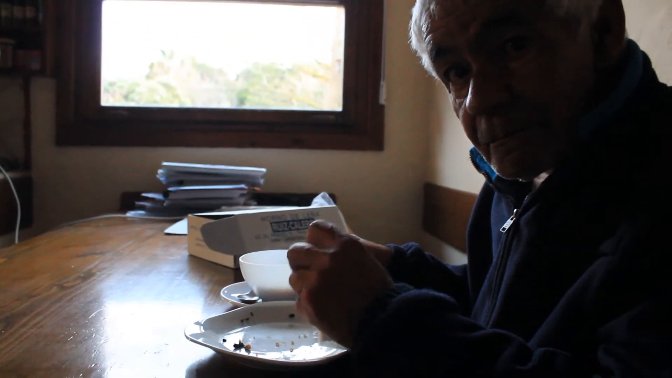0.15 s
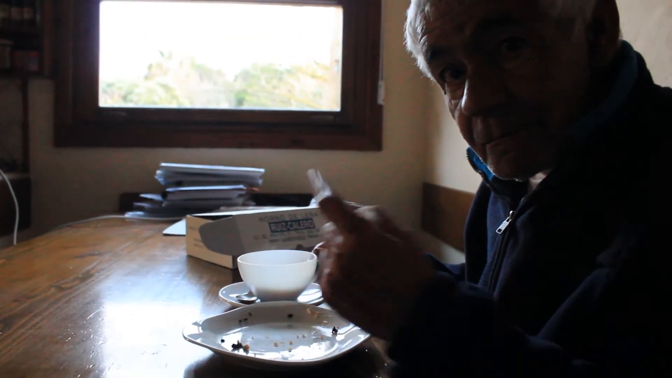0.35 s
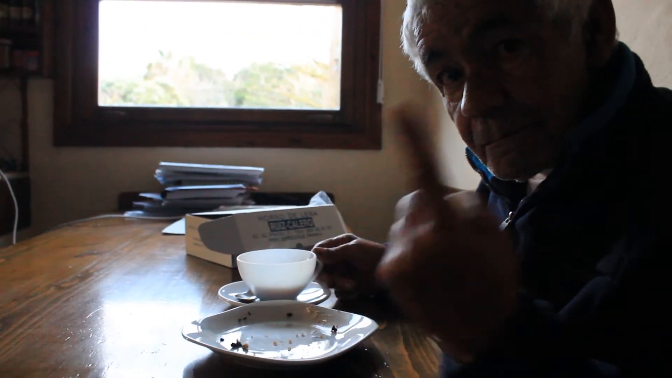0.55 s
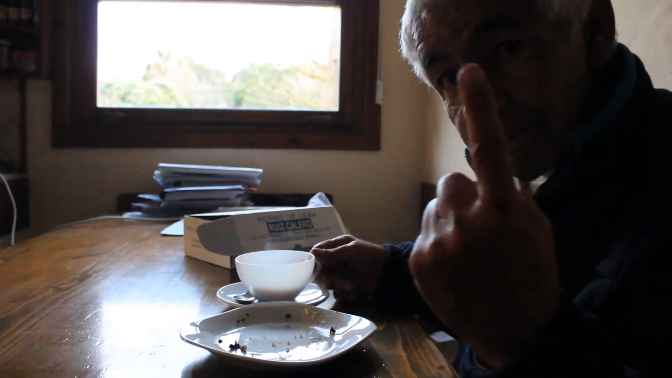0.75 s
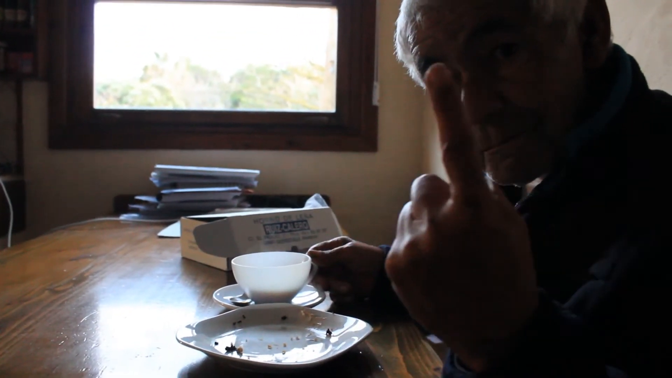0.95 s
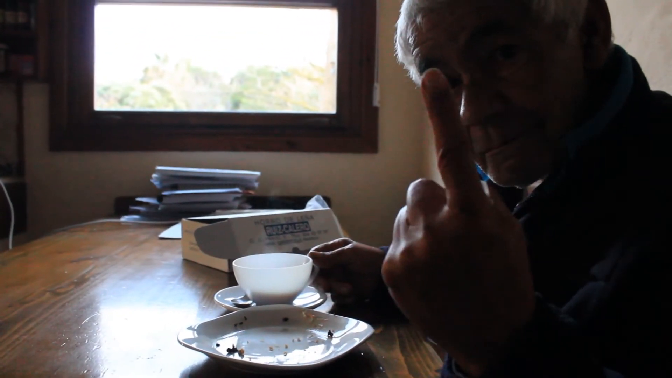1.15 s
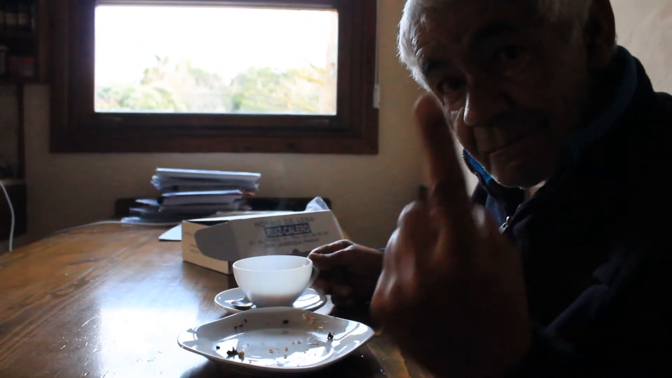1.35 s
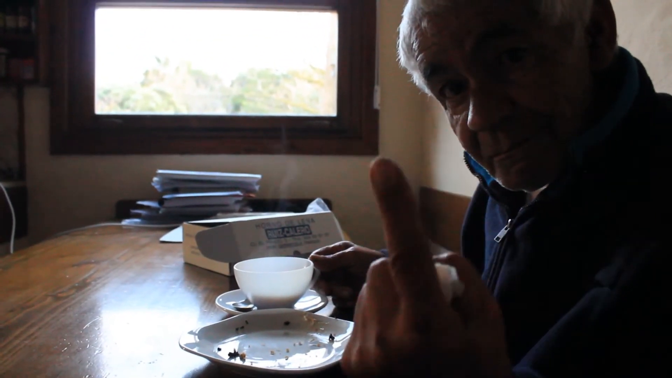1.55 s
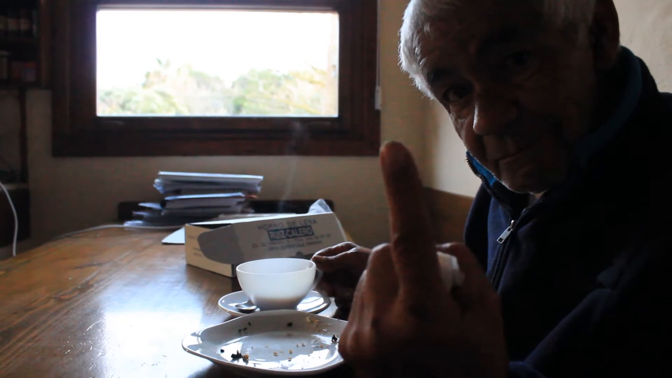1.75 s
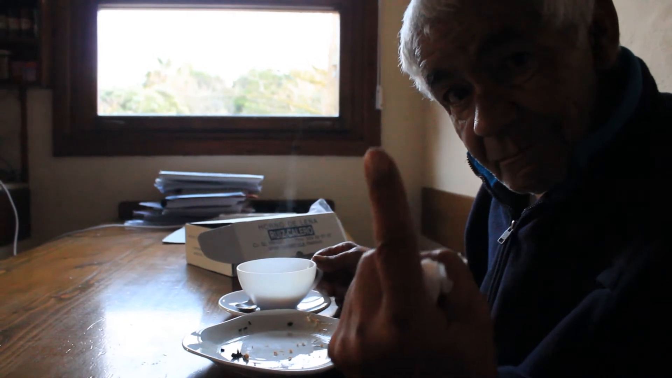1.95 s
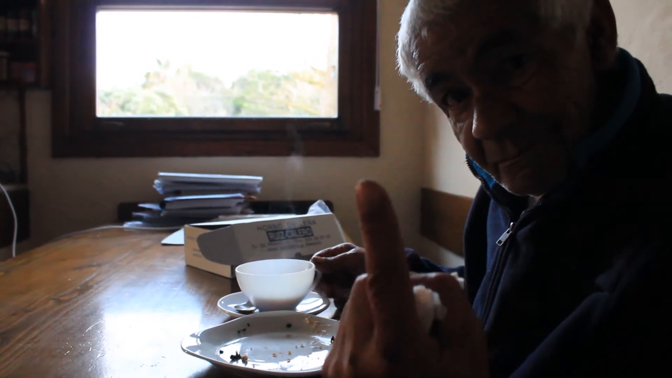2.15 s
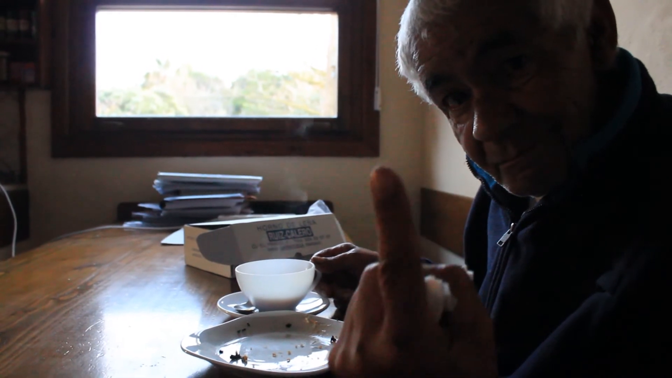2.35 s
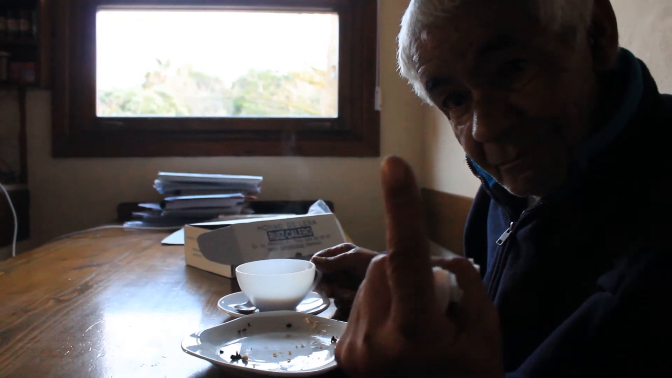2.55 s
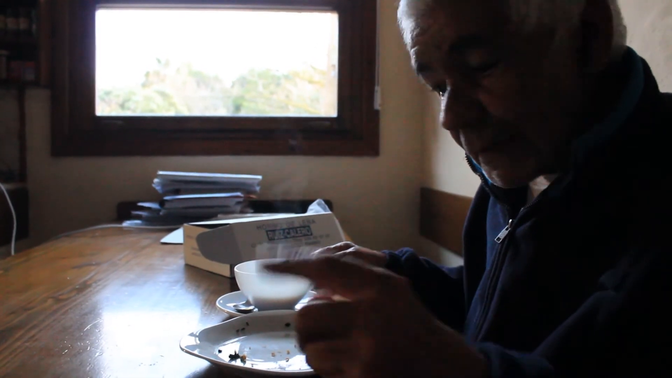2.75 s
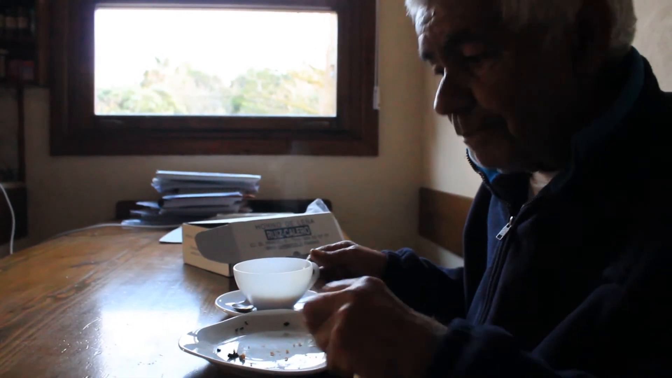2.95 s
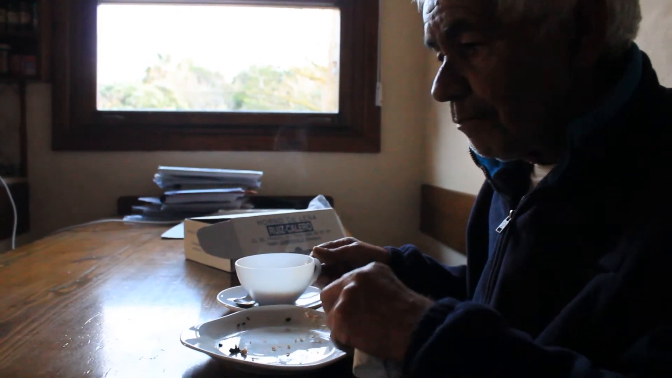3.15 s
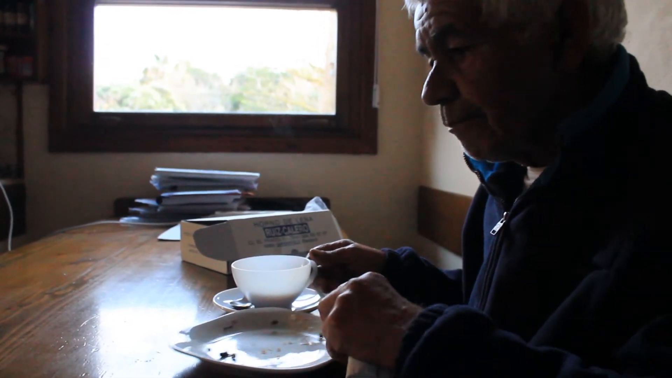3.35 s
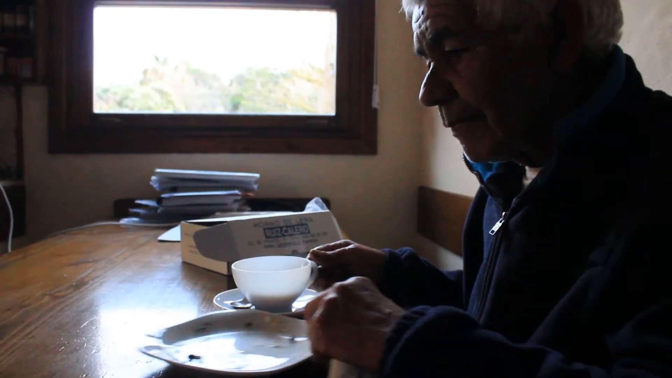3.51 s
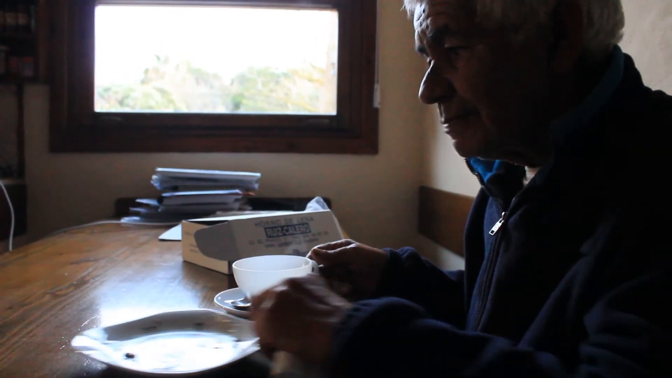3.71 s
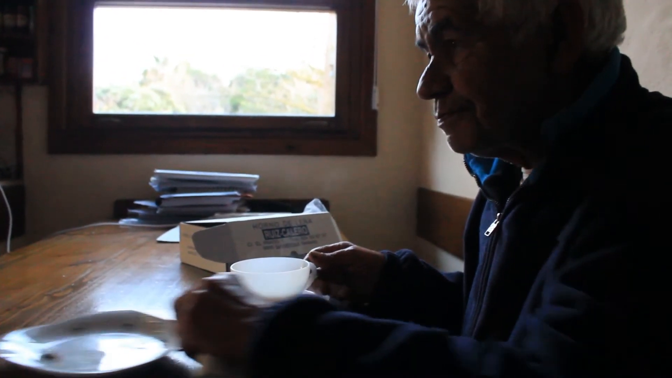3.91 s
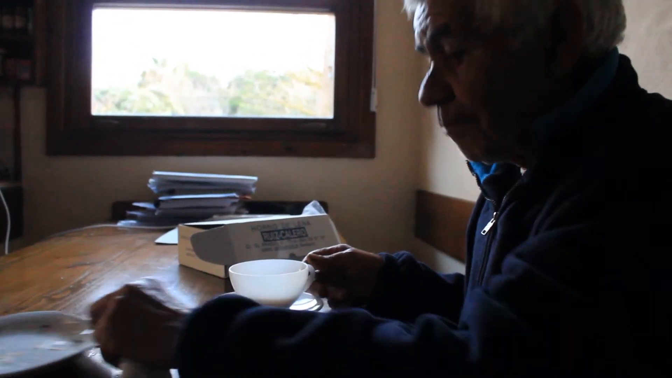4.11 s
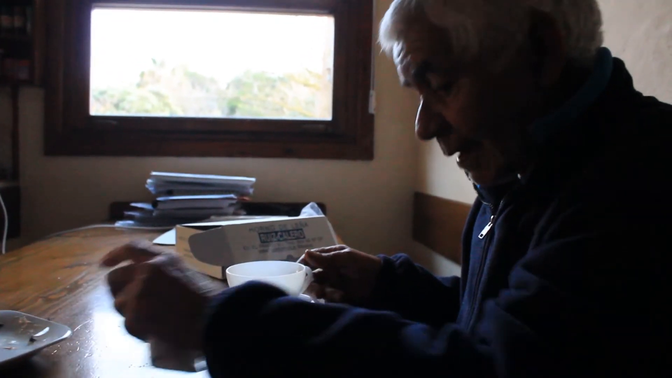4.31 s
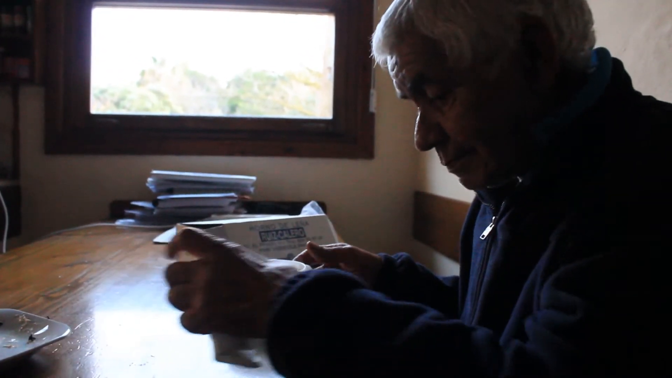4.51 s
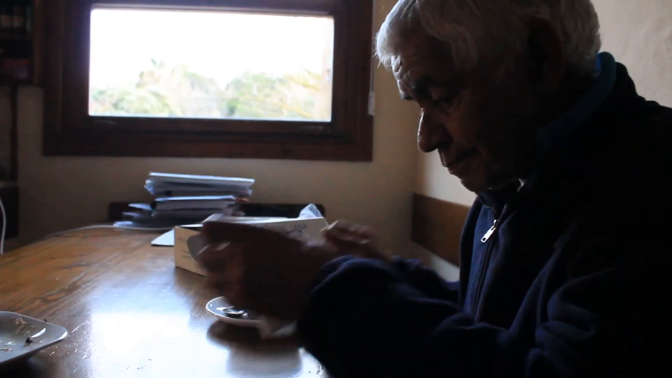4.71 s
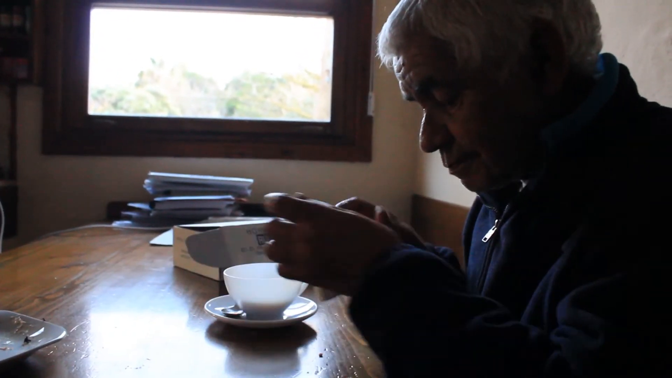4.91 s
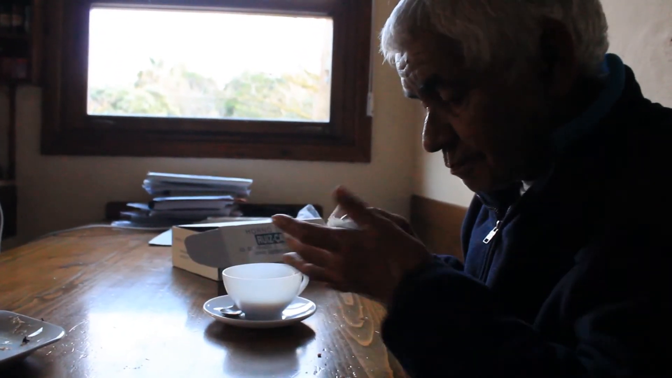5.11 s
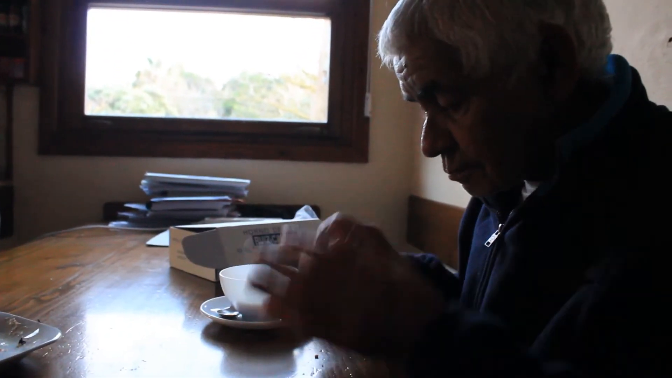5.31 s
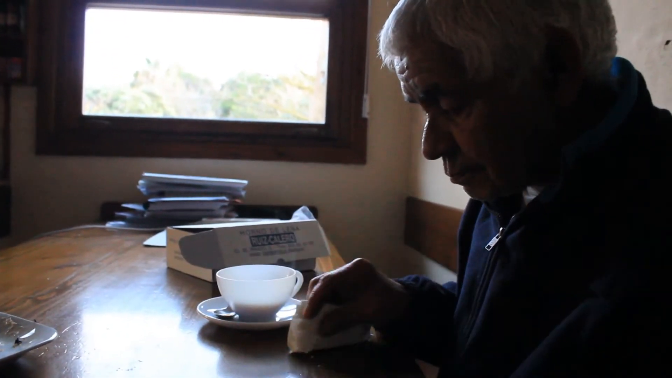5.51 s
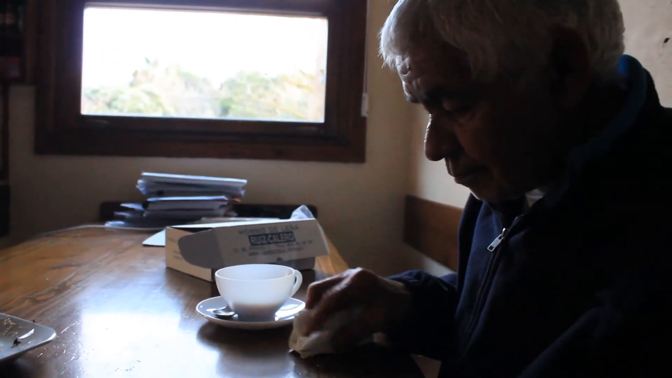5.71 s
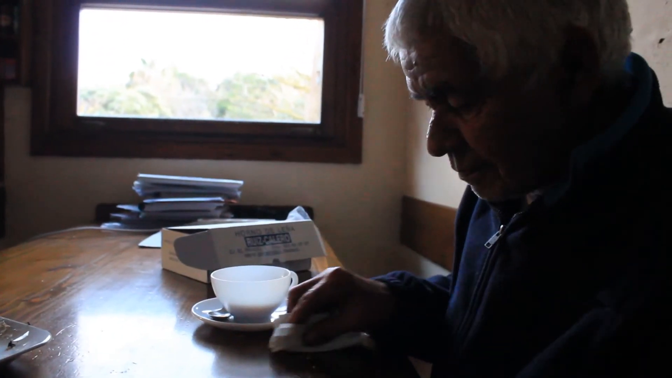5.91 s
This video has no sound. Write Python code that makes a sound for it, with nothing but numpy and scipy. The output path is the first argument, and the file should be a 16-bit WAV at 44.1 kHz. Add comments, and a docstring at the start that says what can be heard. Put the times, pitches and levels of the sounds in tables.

```python
"""China is handled on a wooden table in a bare, ringing kitchen, heard in mono from across the table.
A cup and spoon rattle on their saucer, a plate is knocked, the cup clinks: fading modes and dry clacks.
The plate is pushed over the wood: random slips shake the table top and the plate's rim.
Shaped noise makes the scuffs, taps, thumps, sharp dry ticks, rustling sleeves and napkin, and the hush."""
import sys
import numpy as np
from scipy import signal
from scipy.fft import rfft, irfft, next_fast_len
from scipy.io import wavfile
from scipy.ndimage import uniform_filter1d, map_coordinates

SR = 44100
rng = np.random.default_rng(int(sys.argv[2]) if len(sys.argv) > 2 else 0)


def store_pcm(level_fs):
    """Save levels as 16-bit WAV."""
    pcm = np.round(np.clip(level_fs, -1, 1) * 32767).astype(np.int16)
    wavfile.write(sys.argv[1], SR, np.atleast_2d(pcm).T)


N = 263277
TIME = np.arange(N) / SR
RING_TIME = np.arange(SR * 3 // 5) / SR  # time axis of one contact
TOP_HZ = 15500  # upper limit of the sound
SAUCER_REBOUND_S = .0175  # time between the contacts of one rattle

# Colour of a dry contact. Each row: frequency in Hz, relative level in dB.
CLACK_COLOUR = [(100, -30), (400, -16.5), (850, 1), (4000, 2), (7300, 3), (9000, -2.5), (12000, -12.5),
                (15000, -16)]


def saucer_and_spoon():
    """Cup and spoon jostle on the saucer, so that saucer and spoon ring together."""
    # Each row: start in seconds, loss per rebound in dB, ring brightness in Hz, clack level in dB,
    # saucer ring level in dB, spoon ring level in dB
    saucer_hits = [(.261, 6.5, 9400, -33, -36.5, -59), (.581, 6.5, 2500, -33, -30.5, -51),
                   (.612, 14, 1760, -43, -29.5, -50), (.664, 9, 13000, -34, -44, -54),
                   (.742, 5.5, 15000, -24.5, -28, -23.5), (.792, 3, 12100, -27, -24, -20),
                   (.843, 18.5, 3500, -31, -32, -48), (.871, 16, 15000, -37, -36, -27),
                   (1.542, 10, 8600, -36, -32, -34), (2.648, 9, 12000, -36, -39, -31),
                   (2.701, 5, 13000, -29.5, -35, -36), (3.040, 26, 6500, -55, -47, -46)]
    # Modes of the saucer. Each row: frequency in Hz, relative level in dB, time to fall 60 dB in seconds
    saucer_modes = [(1304, 5.5, 0.34), (2220, 1.5, 0.22), (3105, 1, 0.39), (4300, 2, 0.25), (5000, 7, 0.19),
                    (5920, 14.5, 0.23), (6810, 8.5, 0.28), (7740, 8, 0.28), (8323, -1, 0.16),
                    (9520, -0.5, 0.22), (10000, 1, 0.18), (11700, 0, 0.26)]
    # Modes of the spoon, same columns: frequency in Hz, relative level in dB, 60 dB fall in seconds
    spoon_modes = [(2654, -9, .35), (3704, -12, .5), (4270, -11, 0.35), (4910, -3.5, 0.2), (5567, -1, 0.85),
                   (6400, -6, 0.28), (7316, -4, 0.32), (9838, -7, 0.2), (10565, -7, 0.3), (11070, -9, 0.2)]
    return china(saucer_hits, [saucer_modes, spoon_modes], chatter_t60=0.26,
                 rebound_s=SAUCER_REBOUND_S, overtone_t60=0.11)


def plate():
    """The plate rocks and strikes; most of its modes die quickly."""
    # Each row: start in seconds, loss per rebound in dB, ring brightness in Hz, clack level in dB,
    # ring level in dB
    plate_hits = [(3.042, 19, 5030, -51, -43.5), (3.174, 9.5, 13000, -21, -16),
                  (3.186, 13, 13900, -21.5, -17)]
    # Modes of the plate. Each row: frequency in Hz, relative level in dB, time to fall 60 dB in seconds
    plate_modes = [(1237, 5, 0.082), (2112, -0.5, 0.39), (2130, 13, 0.056), (3190, 9, 0.045),
                   (3227, -9, 0.29), (3550, 2, 0.095), (4510, 9, 0.04), (5000, -21, 0.4), (5850, -7, 0.67),
                   (6790, 0.5, 0.11), (6950, -10, 0.74), (9940, -7, 0.29), (10820, -3.5, 0.15)]
    return china(plate_hits, [plate_modes], chatter_t60=0.011, rebound_s=.009, overtone_t60=0.035)


def cup():
    """The cup is nudged and settles in a few rebounds, ringing in its own modes."""
    # Each row: start in seconds, loss per rebound in dB, ring brightness in Hz, clack level in dB,
    # ring level in dB
    cup_hits = [(5.189, 3.5, 7000, -38, -26), (5.241, 3.5, 3500, -57, -47)]
    # Modes of the cup. Each row: frequency in Hz, relative level in dB, time to fall 60 dB in seconds
    cup_modes = [(445, -15.5, 0.85), (1182, -6.5, 0.14), (1245, -11, 0.084), (2072, -11.5, 0.56),
                 (2123, -0.5, 0.16), (3280, 0.5, 0.037), (6780, -7, 0.058)]
    return china(cup_hits, [cup_modes], chatter_t60=0.018, rebound_s=.024)


def spoon_on_cup():
    """The spoon's handle chinks against the cup and sets off a clear ring."""
    # Each row: start in seconds, loss per rebound in dB, ring brightness in Hz, clack level in dB,
    # ring level in dB
    chink_hits = [(.743, 9.5, 14000, -27.5, -29), (1.075, 9.5, 8900, -28.5, -30.5)]
    # Modes of the chink. Each row: frequency in Hz, relative level in dB, time to fall 60 dB in seconds
    chink_modes = [(2088, -3.5, 0.82), (2920, -8, 0.55), (3120, -6.5, 0.5), (3750, -4.5, 0.25),
                   (5098, -6, 0.31), (6315, -2, 0.14), (7480, 4, 0.22)]
    return china(chink_hits, [chink_modes], chatter_t60=0.1,
                 rebound_s=SAUCER_REBOUND_S, overtone_t60=0.18)


def tinkle():
    """Something small and metallic tinkles faintly, with high modes only."""
    # Each row: start in seconds, loss per rebound in dB, ring brightness in Hz, clack level in dB,
    # ring level in dB
    tinkle_hits = [(.055, 14, 13000, -55, -44), (.107, 23, 9400, -63, -42)]
    # Its modes. Each row: frequency in Hz, relative level in dB, time to fall 60 dB in seconds
    tinkle_modes = [(7250, 4.5, 0.16), (7946, -4, 0.28), (8900, -2, 0.3), (10140, 3, 0.14),
                    (11880, -5, 0.21)]
    return china(tinkle_hits, [tinkle_modes], chatter_t60=0.024, rebound_s=SAUCER_REBOUND_S)


def china(hits, objects, chatter_t60, rebound_s, overtone_t60=0.049, choke_t60=0.14, bass_hz=200, count=4):
    """Each hit rebounds ever weaker; contacts clack and ring the objects until the next hit chokes them."""
    out = np.zeros(N)
    pitches = overtone_pitches()
    ends = [hit[0] for hit in hits[1:]] + [N / SR]
    for (s, loss_db, bright_hz, clack_db, *ring_db), end in zip(hits, ends):
        for k in range(count):
            if k * loss_db >= 20:  # too weak to matter
                break
            start = s + k * rebound_s
            choked_s = np.maximum(start + RING_TIME - max(end, start), 0)
            choke = amp(-60 * choked_s / choke_t60)
            rings = choke * sum(amp(db) * ring(modes, bright_hz) for db, modes in zip(ring_db, objects))
            contact = amp(clack_db) * clack(chatter_t60, overtone_t60, pitches) + rings
            add(out, start, amp(-k * loss_db) * kitchen(contact))
    # small things radiate little bass
    return filtered(out, lambda hz: (1j * hz / (bass_hz + 1j * hz)) ** 2)


def ring(modes, bright_hz, scatter_db=1.8):
    """Free ringing; a soft contact spares the high modes, and each contact shares energy differently."""
    hz, db, t60 = np.transpose(modes)[:, :, None]
    softness = np.sqrt(1 + (hz / bright_hz) ** 6)
    level = amp(db + scatter_db * rng.standard_normal(hz.shape)) / softness
    decay = np.exp(-np.log(1000) * RING_TIME / t60)
    return blow(np.sum(level * decay * np.sin(2 * np.pi * hz * RING_TIME), axis=0))


def clack(chatter_t60, overtone_t60, pitches, chatter_db=-7):
    """Glaze on glaze: a brief chatter of noise and a crowd of small, quickly dying overtones."""
    t = RING_TIME[:SR // 16]
    chatter = blow(noise(CLACK_COLOUR, len(t)) * amp(-60 * t / chatter_t60))
    lines = pitches * np.exp(2j * np.pi * rng.random(len(pitches)))  # fresh phases at every contact
    overtones = blow(irfft(lines, len(RING_TIME)) * amp(-60 * RING_TIME / overtone_t60))
    chatter = np.pad(chatter, (0, len(RING_TIME) - len(t)))
    return blow(amp(chatter_db) * chatter + overtones)


def overtone_pitches(count=110):
    """Spectrum of the many small overtones that one piece of china keeps from contact to contact."""
    hz = np.fft.rfftfreq(len(RING_TIME), 1 / SR)
    pitches = (np.arange(count) + rng.random(count)) * TOP_HZ / count
    lines = np.bincount((pitches / hz[1]).astype(int), minlength=len(hz))
    return lines * amp(along(CLACK_COLOUR, hz))


def slide(slips_per_s=400, spread_db=3, rim_width_hz=12.0, direct_db=0, judder_db=2):
    """A dish's foot sticks and slips over the wood, shaking table and rim; the faster, the louder."""
    # The saucer shifts, the plate creeps, slides and judders to a stop. Each row: start in seconds,
    # time to full speed in seconds, length in seconds, level in dB, bass limit in Hz, brightness in Hz,
    # rim ring in dB relative to the wood
    pushes = [(0.242, 0.02, 0.19, -36.5, 480, 5000, -15), (3.333, 0.073, 0.53, -41, 100, 1000, -16),
              (3.546, 0.37, 0.684, -21, 187, 940, -18.5), (4.226, 0.0044, 0.069, -22.5, 148, 1200, -17.5)]
    # The plate's foot catches on the wood. Each row: time in seconds, surge of the wood's sound in dB
    catches = [(3.655, 4.5), (3.848, 4), (3.96, 2), (4.076, 4.5), (4.185, 1), (4.25, 5.5)]
    # The rubbed rim sings. Each row: frequency in Hz, relative level in dB
    rim_modes = [(1125, 3.5), (1367, 3), (2555, -1.5), (2778, -4.5), (3230, -6), (4527, -2.5), (6858, -1),
                 (7060, -2.5), (7430, -13), (8820, -15), (10700, -20)]
    catch_s = 1 / 64  # half the length of a surge
    brake_s = 0.064  # time in which a pushed dish loses most of its speed

    out = np.zeros(N)
    surge = amp(sum(db * np.exp(-((TIME - s) / catch_s) ** 2) for s, db in catches))
    # higher modes of the rim are more damped
    rim_resonances = [(f, rim_width_hz * np.sqrt(f / rim_modes[0][0]), db) for f, db in rim_modes]
    for start, attack, length, level_db, bass_hz, dull_hz, rim_db in pushes:
        slip_sizes = amp(spread_db * np.clip(rng.standard_normal(N), -2, 2))
        slips = (rng.random(N) < slips_per_s / SR) * slip_sizes
        friction = unit((slips - slips.mean()) * amp(judder_db * wobble(45)))
        force = friction * amp(level_db) * gesture(start, attack, length, brake_s)
        wood = filtered(surge * force, lambda hz: table(hz) * (
            1j * hz / (bass_hz + 1j * hz) / (1 + 1j * hz / dull_hz)) ** 2)
        rim = filtered(force, lambda hz: body(rim_resonances, hz))
        out += np.std(force) * (unit(wood) + amp(rim_db) * unit(rim))
    return kitchen(out, direct_db=direct_db)[:N]


def thumps(length=0.0099):
    """Soft blows ring the table top: decaying bursts of noise, each dulled above its own limit."""
    # Each row: start in seconds, level in dB, brightness in Hz
    blows = [(1.544, -49, 60), (1.887, -48, 1800), (3.048, -34.5, 190), (3.107, -35.5, 150),
             (3.192, -31.5, 338), (5.162, -53, 130), (5.566, -55.5, 129)]
    out = np.zeros(N)
    for s, db, soft_hz in blows:
        force = rng.standard_normal(len(RING_TIME)) * np.exp(-RING_TIME / length)
        knock = filtered(force, lambda hz: table(hz) * (1 + 1j * hz / 300) / (1 + 1j * hz / soft_hz) ** 2)
        add(out, s, amp(db) * kitchen(blow(knock)))
    return out


def table(hz):
    """Response of the table top with the plate on it; it radiates little deep bass."""
    # Each row: resonance in Hz, width in Hz, relative level in dB
    table_modes = [(74, 27, -6), (196.6, 15, 7), (308, 44, 2), (375, 60.5, 0), (451.4, 46, -2.5),
                   (512.5, 28.5, -2.5), (631, 104, -12), (689, 14.5, -3), (830, 173, -14)]
    return body(table_modes, hz) * (1j * hz / (100 + 1j * hz)) ** 2


def ticks(cycles=5.3, relative_width=0.69, room_db=-7):
    """Sharp dry ticks: tiny snaps that die within a few cycles, heard with little room."""
    # Each row: start in seconds, peak level in dB before the room is added, centre frequency in Hz
    snaps = [(2.83, -21, 8200), (2.848, -19, 6860), (2.880, -18, 6800), (3.196, -4, 5900),
             (3.659, -17.5, 6400), (3.697, -8, 5160), (4.387, -22, 5950), (4.424, -18, 4770)]
    out = np.zeros(N)
    t = RING_TIME[:SR // 50]
    for s, db, centre_hz in snaps:
        snap = rng.standard_normal(len(t)) * np.exp(-t * centre_hz / cycles)
        snap = filtered(snap, lambda hz: body([(centre_hz, centre_hz * relative_width, 0)], hz) ** 2)
        add(out, s, amp(db) * snap / np.abs(snap).max())
    return out + amp(room_db) * kitchen(out)[:N]


def scuffs():
    """Dry scuffs of hands and things on the table, and the tick at 3.7 s lingering in the room: broad bands of
    fading noise."""
    # Each row: start in seconds, level in dB, centre frequency in Hz
    scuff_contacts = [(.0, -33, 2410), (.2, -37, 2540), (.308, -37, 4450), (1.189, -35, 1930),
                      (2.395, -31.5, 7950), (2.565, -28.5, 2150), (3.698, -34, 7500), (5.05, -35.5, 3940),
                      (5.765, -30.5, 3680), (5.945, -31.5, 5000)]
    return damped_contacts(scuff_contacts, octaves=1.65, length=0.028)


def hollow_taps():
    """Light hollow taps: a narrow band of noise gives each one a pitch."""
    # Each row: start in seconds, level in dB, pitch in Hz
    tap_contacts = [(.385, -36, 560), (.969, -38.5, 1580), (1.885, -39, 1630), (2.07, -50, 1730),
                    (3.043, -44, 3940), (4.507, -43, 2060), (4.66, -43.5, 3900)]
    return damped_contacts(tap_contacts, octaves=0.15, length=0.015)


def damped_contacts(contacts, octaves, length):
    """Each contact is a short burst of noise around one frequency that the room draws out."""
    out = np.zeros(N)
    for s, db, centre_hz in contacts:
        # the gain is half at this many octaves from the centre
        band = lambda hz: 1 / (1 + (np.log2((hz + 1) / centre_hz) / octaves) ** 2)
        burst = filtered(noise(CLACK_COLOUR, len(RING_TIME)), band)
        add(out, s, amp(db) * kitchen(blow(burst * np.exp(-RING_TIME / length))))
    return out


def rustle(flutter_db=1.5, grain_db=3):
    """Sleeves and napkin rub unevenly while an arm moves: noise with slow flutter and fast grain."""
    # Arm movements that rub the cloth. Each row: start in seconds, length in seconds, level in dB
    strokes = [(0, 0.033, -39), (0.315, 0.83, -39), (2.472, 0.2, -50.5), (2.62, 0.22, -42),
               (2.96, 0.83, -44), (3.582, 0.93, -41.5), (5.015, 0.65, -42.5), (5.8, 0.17, -38)]
    # Colour of the cloth. Each row: frequency in Hz, relative level in dB
    cloth_colour = [(60, -19), (300, 1), (800, 4.5), (3400, 2.5), (7500, -3), (10000, -12.5), (15000, -20)]
    attack_s, release_s, resting_db = 0.014, 0.2, -50.5  # the cloth never lies quite still
    power = sum((amp(db) * gesture(s, attack_s, length, release_s)) ** 2 for s, length, db in strokes)
    unevenness = amp(flutter_db * wobble(18) + grain_db * wobble(200))
    rubbing = unit(noise(cloth_colour, N) * unevenness)
    return kitchen(np.sqrt(power + amp(resting_db) ** 2) * rubbing)[:N]


def gesture(start, attack, length, release):
    """Speed of one movement: it gathers evenly, holds, and dies away."""
    t = TIME - start
    return np.clip(t / attack, 0, 1) * np.exp(-np.maximum(t - length, 0) / release)


def hush():
    """The hush of the room: quiet coloured noise whose level drifts slowly."""
    # Each row: frequency in Hz, relative level in dB
    hush_colour = [(22, -8), (110, 1), (250, 2.5), (480, -5), (830, 0), (1250, -8), (3500, -1),
                   (6500, -8.5), (10000, -22), (15000, -14.5)]
    return amp(-50.0 + wobble(3.32)) * noise(hush_colour, N)


def kitchen(x, direct_db=-17, early_db=4, early_s=0.0097, build_s=0.00031):
    """x with the room's answer: a direct path, strong near walls, a diffuse tail; its energy is kept."""
    # Each row: frequency in Hz, time for the room to fall 60 dB in seconds
    room_t60 = [(100, 0.72), (500, 0.48), (1500, 0.44), (4000, 0.45), (8000, 0.38), (14000, 0.21)]
    size = SR * 2 // 3
    hz, t, z = signal.stft(rng.standard_normal(size), SR, nperseg=256)
    decay_db = -60 * t / along(room_t60, hz)[:, None] + early_db * np.exp(-t / early_s)
    spectrum = rfft(signal.istft(z * amp(decay_db), SR, nperseg=256)[1], size)
    # the walls favour no single pitch
    even = spectrum / np.sqrt(uniform_filter1d(np.abs(spectrum) ** 2, size=14) + 1e-9)
    tail = irfft(even, size)[:SR // 2]
    # reflections pile up over the first milliseconds
    tail *= 1 - np.exp(-TIME[:len(tail)] / build_s)
    tail[0] += amp(direct_db)
    wet = signal.fftconvolve(x, tail)
    return wet * np.linalg.norm(x) / (np.linalg.norm(wet) + 1e-20)


def body(modes, hz):
    """Causal response of (Hz, width, dB) resonances; neighbouring modes swing in opposite senses."""
    return sum((-1) ** k * amp(db) * 1j * hz * width / (centre * centre - hz * hz + 1j * hz * width)
               for k, (centre, width, db) in enumerate(modes))


def noise(spectrum, size):
    """Noise of rms 1 with the given colour."""
    return unit(filtered(rng.standard_normal(size), lambda hz: amp(along(spectrum, hz))))


def filtered(x, response):
    """x times a response of frequency."""
    m = next_fast_len(len(x) + SR // 4)
    return irfft(rfft(x, m) * response(np.fft.rfftfreq(m, 1 / SR)), m)[:len(x)]


def along(points, hz):
    """(Hz, value) points joined on a log frequency axis."""
    f, v = np.transpose(points)
    return np.interp(np.log(hz + 1), np.log(f), v)


def wobble(rate):
    """A smooth random curve through this many random points a second."""
    return map_coordinates(rng.standard_normal(int(N * rate / SR) + 4), [TIME * rate])


def amp(db):
    """Decibels to gain."""
    return 10 ** (np.asarray(db) / 20)


def unit(x):
    """x at rms 1."""
    return x / np.sqrt(np.mean(x ** 2) + 1e-20)


def blow(x):
    """x with the energy of 50 ms at rms 1."""
    return x / (np.linalg.norm(x) + 1e-20) * np.sqrt(SR / 20)


def add(track, s, x):
    """Mix x into the track at time s in seconds."""
    start = max(round(s * SR), 0)
    track[start:start + len(x)] += x[:max(N - start, 0)]


def scene():
    """All sources over the hush of the room, the same in both channels."""
    clinks = saucer_and_spoon() + plate() + cup() + spoon_on_cup() + tinkle()
    handling = slide() + thumps() + ticks() + scuffs() + hollow_taps() + rustle()
    mono = clinks + handling + hush()
    return np.array([mono, mono])


def record(dry, treble_hz=8500):
    """The microphone loses the high treble, and nothing passes above the upper limit."""
    microphone = lambda hz: (hz < TOP_HZ) / np.sqrt(1 + (hz / treble_hz) ** 8)
    return np.array([filtered(channel, microphone) for channel in dry])


dry = scene()
out = record(dry)
store_pcm(out)
```